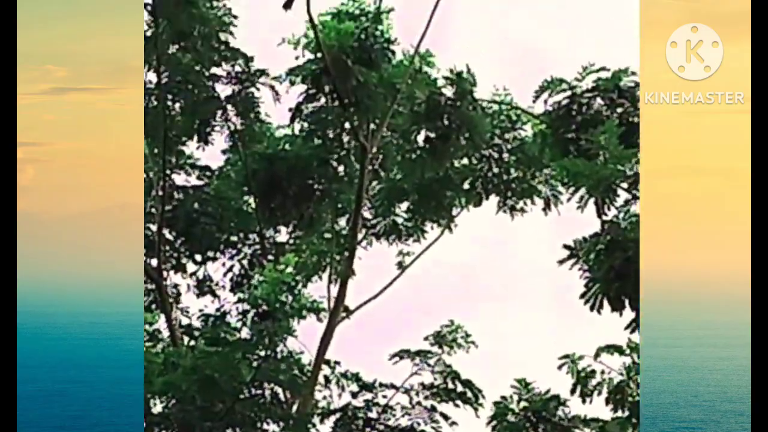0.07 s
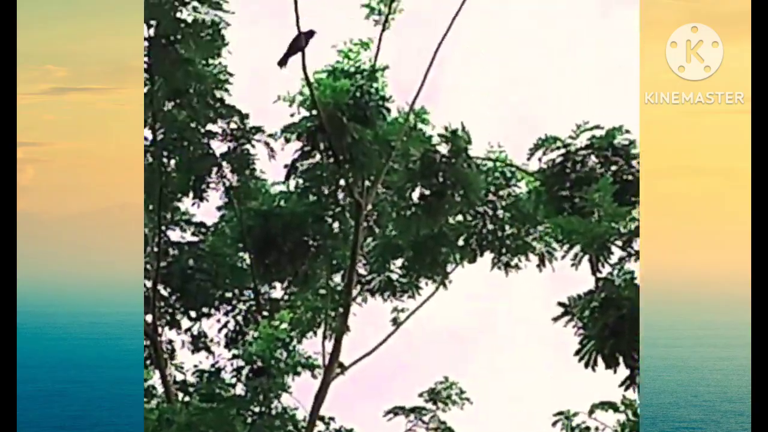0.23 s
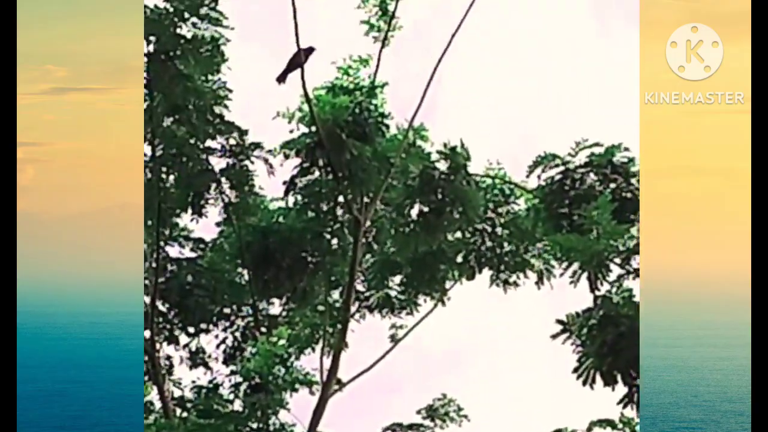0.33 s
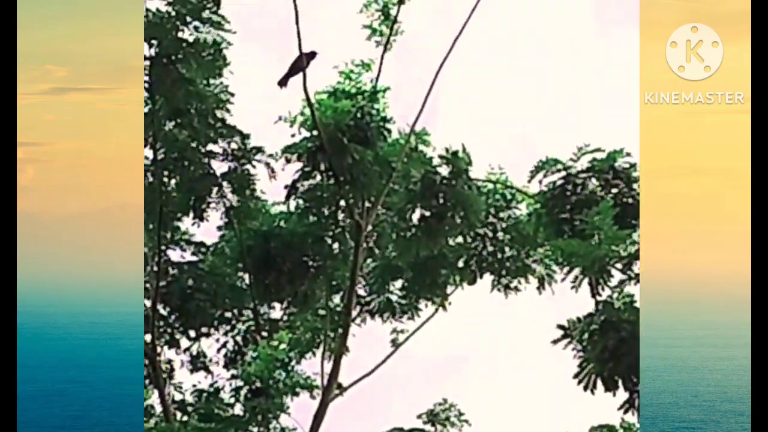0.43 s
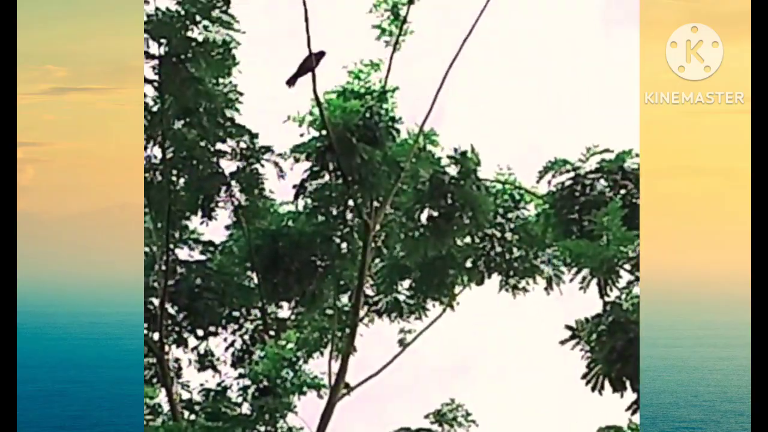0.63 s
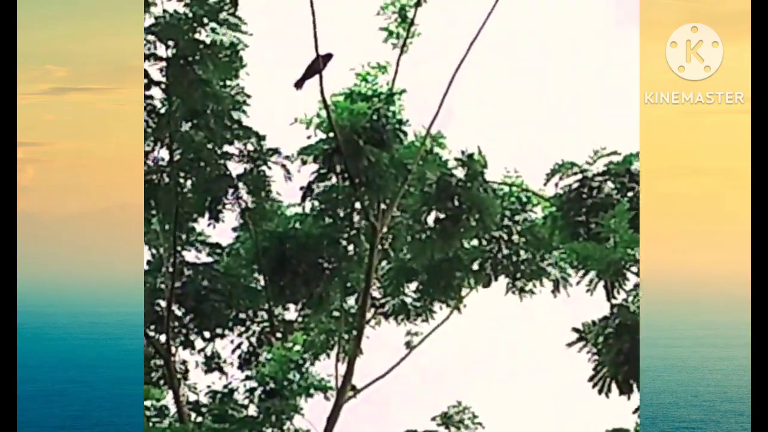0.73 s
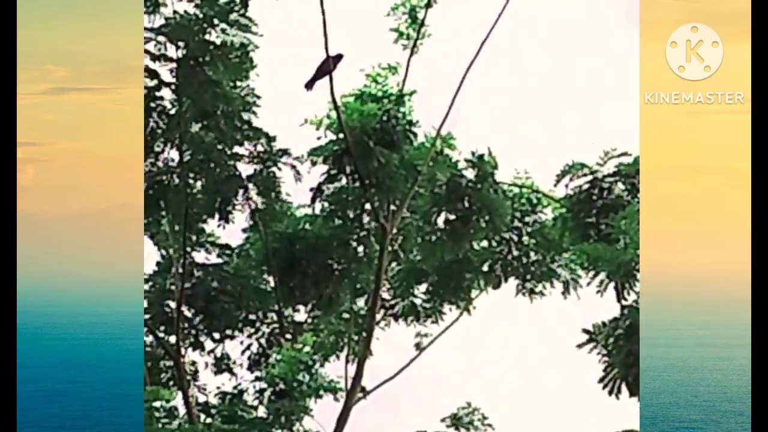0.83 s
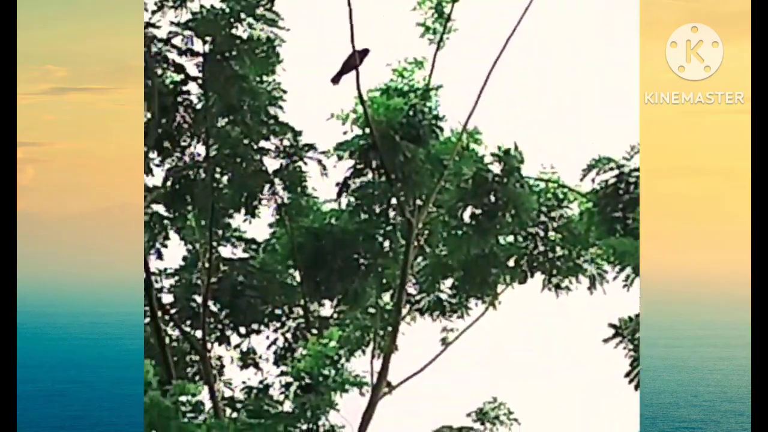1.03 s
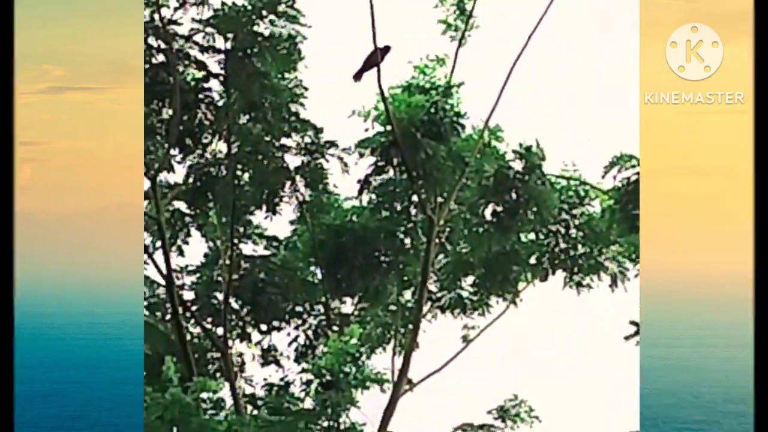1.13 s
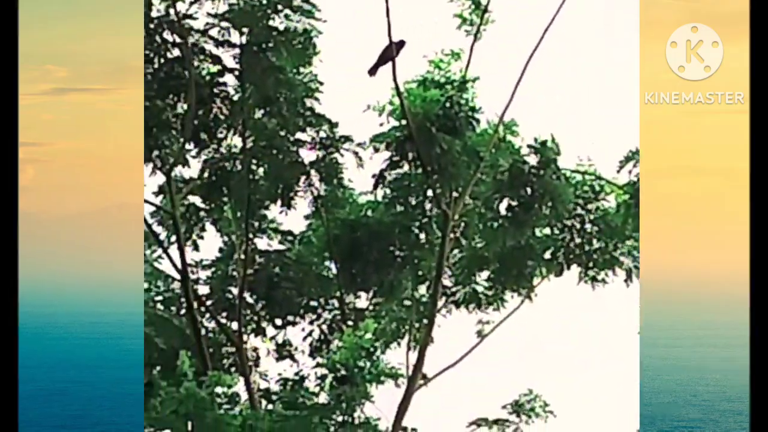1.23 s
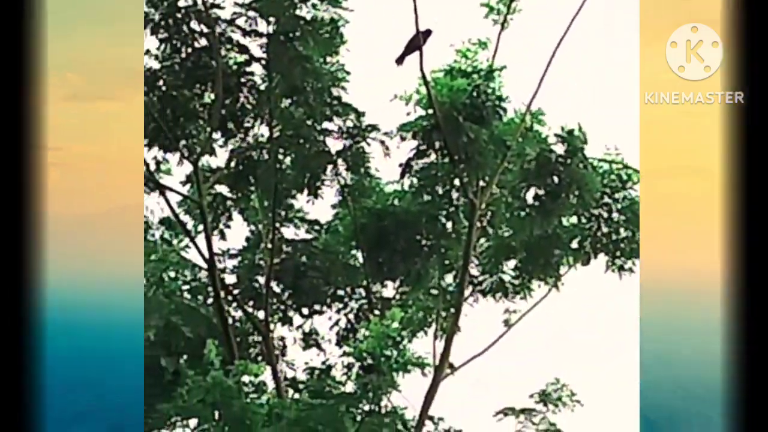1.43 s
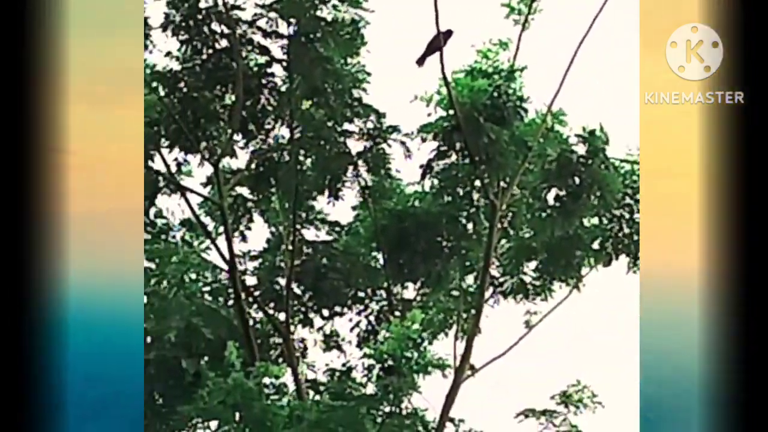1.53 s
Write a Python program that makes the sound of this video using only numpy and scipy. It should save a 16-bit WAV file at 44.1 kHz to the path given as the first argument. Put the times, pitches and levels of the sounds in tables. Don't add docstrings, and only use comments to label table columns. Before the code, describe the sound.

Outdoors among trees, a buzzing trill is already going when a near-pure koel call sounds, then fades into echoes. Two more buzzes and small far chirps follow over distant engine hum and soft hiss, picked up by a stereo microphone.

```python
import sys
import numpy as np
from scipy import signal
from scipy.io import wavfile
from scipy.ndimage import uniform_filter1d

SR = 44100
rng = np.random.default_rng(int(sys.argv[2]) if len(sys.argv) > 2 else 0)


def transcribe(u):
    v = np.clip(np.atleast_2d(u).T, -1, 1)
    q = np.round(v * 32767).astype(np.int16)
    wavfile.write(sys.argv[1], SR, q)


def ratio_of_db(decibels):
    return 10 ** (np.asarray(decibels, float) / 20)


N = 70560
T = np.arange(N) / SR

# (time [s], pitch [Hz])
KOEL_PITCH = [(.205, 958), (.229, 1251), (.27, 1220), (.33, 1194), (.39, 1214), (.46, 1309), (.51, 1329),
              (.565, 1252), (.645, 832)]
# (time [s], left level [dB],
# right level [dB])
KOEL_LOUDNESS = [
    [(.205, -47, -43), (.234, -21, -25), (.26, -19, -22), (.287, -32, -19), (.301, -38, -26),
     (.325, -34, -22.5), (.365, -34, -24), (.392, -22, -18.5), (.425, -17, -22)],
    [(.44, -20, -28), (.452, -30, -20), (.464, -24, -21), (.475, -19, -19), (.488, -23, -16.5),
     (.525, -24, -20), (.54, -36, -25)],
    [(.556, -24, -29), (.572, -38, -34), (.582, -33, -28), (.597, -40, -34), (.613, -35, -29),
     (.646, -46, -42)],
]
# (time [s], pitch [Hz])
SECOND_VOICE_PITCH = [(.2, 340.4), (.34, 329.3), (.42, 382), (.5, 425.6), (.55, 392.5), (.65, 275)]
# (multiple of pitch [-], multiple of second voice [-],
# first syllable level [dB], second syllable level [dB])
OVERTONES = [(1, -1, -40, -29), (1, 1, -31, -30), (2, 0, -25, -19), (2, -1, -48, -28), (3, 0, -36, -48),
             (4, 1, -50, -21), (5, 0, -21, -29), (5, -1, -36, -34), (5, 1, -38, -32), (6, -1, -35, -40),
             (6, 0, -31, -42), (6, 1, -44, -40), (8, 0, -42, -29), (8, 1, -40, -44), (10, 0, -45, -58),
             (11, 1, -53, -62)]
# (time [s], phase [rad])
HEAD_TURN_PHASE = [(.27, -2.3), (.325, 2.3), (.38, -1.3), (.425, -2.7), (.452, -4.2), (.461, -6.7),
                   (.53, -7.1), (.56, -9), (.585, -7)]
# (start [s], length [s], start pitch [Hz], end pitch [Hz], level [dB])
BEAK_HISS = [(0.24, 0.32, 7000, 6900, -53), (.22, 0.41, 10700, 10000, -63), (.38, .29, 10300, 10500, -59),
             (.22, 0.21, 11500, 12100, -78), (.22, .43, 14100, 13400, -76), (0.4, .16, 2000, 2100, -55),
             (.3, .28, 4300, 4200, -55), (.44, .18, 7900, 7600, -55), (.205, .035, 2150, 2350, -51),
             (.53, .095, 7100, 6300, -51), (.42, .16, 6100, 6200, -54)]
# (delay [s], left level [dB], right level [dB])
ECHOES = [
    (.05, -24, -20),
    (.115, -15, -14),
    (0.2, -17, -16),
    (.29, -19, -19),
]
# (start [s], length [s], level [dB], start of one slow throb [s])
BUZZ_PHRASES = [
    (-.04, 0.46, -45.5, .345),
    (0.57, 0.5, -45.5, .948),
    (1.179, .6, -44.5, 1.547),
]
# (start [s], length [s], start pitch [Hz], end pitch [Hz], level
# [dB])
FAR_WHISTLES = [
    (.8, .125, 4020, 4000, -53),
    (1.07, .05, 4280, 4330, -62),
    (1.27, .04, 2850, 2720, -61),
    (1.4, .04, 2950, 2800, -61),
    (.66, .055, 2260, 2080, -56),
    (.705, .05, 2330, 2170, -57),
    (.545, .075, 5700, 5650, -60),
]
# (start [s], length [s], start pitch [Hz], end pitch [Hz], level [dB])
FAR_RASPS = [
    (1.215, 0.085, 3800, 4250, -45.5),
    (1.28, .12, 4200, 4200, -56),
    (1.06, 0.26, 6800, 7100, -59),
    (.68, .3, 6700, 7100, -58.5),
    (.27, .2, 4700, 4300, -50),
    (0.0, 0.27, 3800, 4400, -53.5),
]
# (pitch [Hz], width [Hz], level [dB])
ENGINE_HUM = [(55.6, 3.3, -58), (86.3, 8.5, -57), (112.14, 3.9, -50), (137.2, 1.7, -47.5),
              (162.7, 12.6, -54.5), (183.5, 7.5, -58), (233.7, 13.6, -61.5), (426.4, 67, -57)]
# (frequency [Hz], level per Hz [dB])
LOW_AIR = [(25, -5), (43, -33), (81, -12), (100, -3.5), (200, -11), (400, -19), (520, -29), (800, -22)]
# (frequency [Hz], level per Hz [dB])
HIGH_AIR = [(700, 0.5), (1500, -1), (2660, -1.5), (4210, -7.5), (5240, -3), (8000, -21.5), (9500, -11.5),
            (10700, -22.5)]
# (frequency [Hz], likeness [0-1])
AIR_LIKENESS = [(60, 1), (150, 1), (350, 1), (700, 0.66), (2000, 0.23), (8000, 0.2)]
# (frequency [Hz], left over right [dB])
AIR_BALANCE = [(60, -7.5), (300, 3), (1000, -5), (8000, -0.5)]


def rms_one(x):
    return x / np.sqrt(np.mean(x ** 2) + 1e-20)


def at_hz(points, hz):
    table_hz, value = np.transpose(points)
    return np.interp(np.log(hz), np.log(table_hz), value)


def drift(rate):
    r = np.exp(-2 * np.pi * rate / SR)
    warm_up = SR // 2
    noise = rng.standard_normal(N + warm_up)
    return rms_one(signal.lfilter([1], [1, -2 * r, r * r], noise)[warm_up:])


def turns(hz):
    return 2 * np.pi * np.cumsum(hz + 0 * T) / SR


def narrow(hz, width_hz):
    phase = turns(hz)
    return drift(width_hz / 2) * np.cos(phase) + drift(width_hz / 2) * np.sin(phase)


def both(hz, width_hz):
    return np.array([narrow(hz, width_hz), narrow(hz, width_hz)])


def gate(start, length, attack, release):
    rise = (T - start) / attack
    fall = (start + length - T) / release
    return np.sin(np.pi / 2 * np.clip(np.minimum(rise, fall), 0, 1)) ** 2


def pan(db):
    return ratio_of_db(np.array([.5 * db + 0 * T, -.5 * db + 0 * T]))


def glides(rows, width_hz, edge_s):
    out = np.zeros((2, N))
    for start, length, from_hz, to_hz, db in rows:
        hz = np.interp(T, [start, start + length], [from_hz, to_hz])
        out += ratio_of_db(db) * gate(start, length, edge_s, edge_s) * both(hz, width_hz)
    return out


def koel():
    s, left_db, right_db = np.transpose(np.concatenate(KOEL_LOUDNESS))
    sides_db = uniform_filter1d([np.interp(T, s, left_db), np.interp(T, s, right_db)], size=300)
    level_db = sides_db.max(axis=0) - 8
    on = gate(s[0], s[-1] - s[0], .005, .012)

    pitch = uniform_filter1d(np.interp(T, *np.transpose(KOEL_PITCH)), size=600)
    pitch = pitch + 1.5 * drift(27)
    syllable_s, blend_s = .43, .03
    late = 1 / (1 + np.exp(-(T - syllable_s) / blend_s * 2))
    sag_khz = late * np.clip(1300 - pitch, 0, None) / 1000

    upper = koel_overtones(pitch, late, sag_khz, sides_db[0])
    upper *= on * ratio_of_db(-26 + .4 * (level_db + 24.0))
    head_turn = [[0], [1]] * np.interp(T, *np.transpose(HEAD_TURN_PHASE))
    tone = on * np.sqrt(2) * np.sin(turns(pitch) + head_turn)

    beak_hiss = glides(BEAK_HISS, width_hz=650, edge_s=.015)
    direct = tone * ratio_of_db(sides_db) + (upper + beak_hiss) * pan(-6.5)
    spread_db = 0.59 * uniform_filter1d(level_db, size=1500) - 7.5 - 32 * sag_khz
    return direct, tone[0] * ratio_of_db(spread_db) + upper[0]


def koel_overtones(pitch, late, sag_khz, left_db):
    second = uniform_filter1d(np.interp(T, *np.transpose(SECOND_VOICE_PITCH)), size=600)
    grown = gate(.222, 1, 0.011, .1)
    upper = np.zeros((2, N))
    for k, m, first_db, second_db in OVERTONES:
        hz = round(k) * pitch + round(m) * second
        line = np.sqrt(2) * np.sin(turns(hz) + rng.uniform(0, 5.1))
        breath = ratio_of_db(-11) * both(hz, 30 * k) * (k * 1200 / 5200) ** 2

        shimmer_db = 4.5
        if k > 2:
            shimmer_db /= np.sqrt(k / 2)
        db = first_db + (second_db - first_db) * late
        db = db + shimmer_db * np.array([drift(22), drift(22)])
        db -= 60 * (max(k - 1.75, 0) + abs(m)) * sag_khz
        if round(k) == 2 and not m:
            db += 17 * np.clip((.238 - T) / .012, 0, 1)
            db += .9 * (0.5 - late) * (left_db + 24.5)
        upper += ratio_of_db(db) * (line + breath) * (grown if k > 2 else 1)

    breath_band = signal.butter(2, (5200, 8200), "band", fs=SR, output="sos")
    breath_fill = rms_one(signal.sosfilt(breath_band, rng.standard_normal((2, N))))
    return upper + ratio_of_db(-27) * grown * breath_fill


def tail(db, t60_s):
    swell = 1 - np.exp(-T / .08)
    fade = ratio_of_db(-60 * T / t60_s) / np.sqrt(SR * t60_s / 14)
    return ratio_of_db(db) * rng.standard_normal((2, N)) * swell * fade


def surroundings(x):
    response = tail(-11, t60_s=0.7) + tail(-18, t60_s=3.2)
    smear_s = .03
    for delay, left_db, right_db in ECHOES:
        burst = np.exp(-((T - delay) / smear_s) ** 2) / np.sqrt(SR * smear_s)
        response += ratio_of_db(np.array([[left_db], [right_db]])) * burst * rng.standard_normal((2, N))
    dull = signal.sosfilt(signal.butter(1, 12000, fs=SR, output="sos"), x)
    return signal.fftconvolve(response, dull[None], axes=1)[:, :N]


def buzzer():
    start_hz, end_hz, rise_s, sweep_hz = 4805, 5282, 0.2, 550
    fast_per_s, slow_per_s = 57, 33
    out = np.zeros((2, N))
    for start, length, db, marked in BUZZ_PHRASES:
        climb = 1 - np.exp(-np.clip(T - start, 0, None) / rise_s)
        slow = (1 + np.tanh((T - marked + .05) / .012)) / 2
        count = np.cumsum(fast_per_s + (slow_per_s - fast_per_s) * slow) / SR
        cycle = (count - np.interp(marked, T, count)) % 1
        hz = start_hz + (end_hz - start_hz) * climb + sweep_hz * climb * (.5 - cycle)

        throb_db = -3.0 * climb * np.cos(2 * np.pi * cycle) - 5 * (1 - climb)
        shape = ratio_of_db(db + throb_db - 0.5) * gate(start, length, .05, 0.14)
        clear = .4 * climb ** 3
        out += shape * (np.sqrt(clear) * narrow(hz, 27) + np.sqrt(1 - clear) * both(hz, 380))
    return out


def far_birds():
    whistles = glides(FAR_WHISTLES, width_hz=8, edge_s=.015)
    return whistles + glides(FAR_RASPS, width_hz=450, edge_s=.04)


def town():
    hum = sum(ratio_of_db(db) * narrow(hz, width_hz) for hz, width_hz, db in ENGINE_HUM)
    steady_level = ratio_of_db(-47.5 + 0.5 * drift(1.7))
    steady_hz = 112.13 + 1.44 * drift(2.32)
    hum += steady_level * np.sqrt(2) * np.sin(turns(steady_hz))
    return hum + ratio_of_db(-45.5) * air(LOW_AIR, patchy_db=1.0)


def air(spectrum, patchy_db):
    out = 0
    white = rng.standard_normal((2, 2, N + SR // 4))
    edges = np.geomspace(spectrum[0][0], spectrum[-1][0], num=15)
    for k, (low, high) in enumerate(zip(edges, edges[1:])):
        band = signal.butter(2, [low, high], "band", fs=SR, output="sos")
        mid, side = signal.sosfilt(band, white[k % 2])[:, -N:]
        hz = np.sqrt(low * high)
        alike = np.clip(at_hz(AIR_LIKENESS, hz), 0, 1)
        gain = ratio_of_db(at_hz(spectrum, hz) + patchy_db * drift(13.3)) * pan(at_hz(AIR_BALANCE, hz))
        out = out + gain * (np.sqrt(1 + alike) * mid + np.sqrt(1 - alike) * side * [[1], [-1]])
    return rms_one(out)


def air_hiss():
    below = signal.cheby2(10, 45, 10920 + 200, fs=SR, output="sos")
    above = signal.cheby2(8, 30, 11400 - 300, "high", fs=SR, output="sos")
    hiss = ratio_of_db(-49) * signal.sosfilt(below, air(HIGH_AIR, patchy_db=2.0))
    return hiss + ratio_of_db(-76) * signal.sosfilt(above, rng.standard_normal((2, N)))


def scene():
    direct, spread = koel()
    background = buzzer() + far_birds() + town() + air_hiss()
    right_lag = 17
    background = np.array([background[0], np.roll(background[1], right_lag)])
    return direct + surroundings(spread) + background


def top_cut(x):
    return signal.sosfilt(signal.butter(12, 15340, fs=SR, output="sos"), x)


def record(dry):
    return top_cut(dry)


dry = scene()
out = record(dry)
transcribe(out)
```